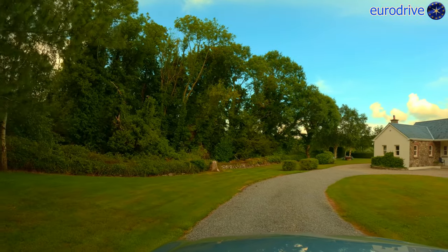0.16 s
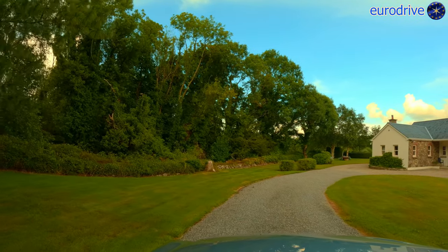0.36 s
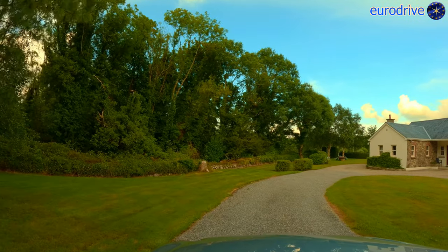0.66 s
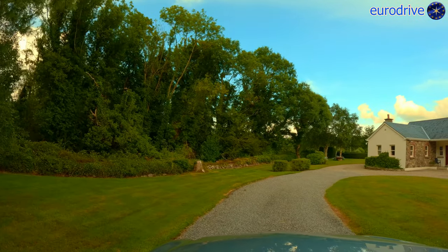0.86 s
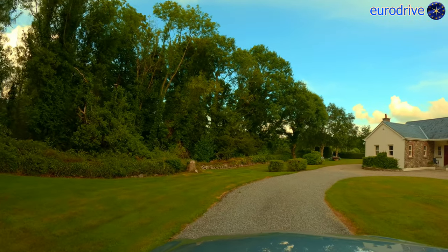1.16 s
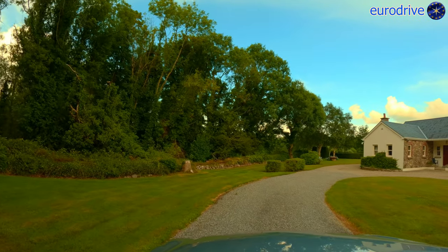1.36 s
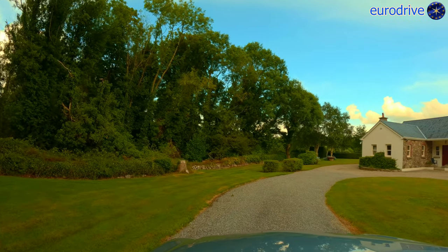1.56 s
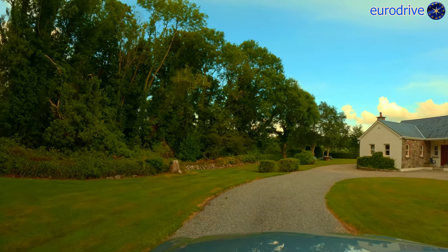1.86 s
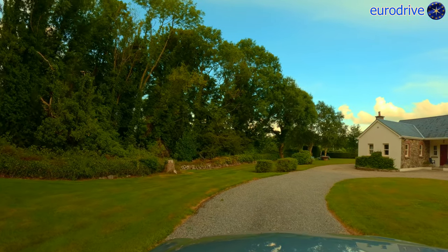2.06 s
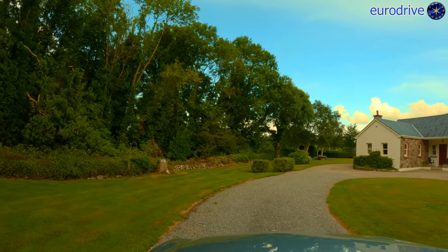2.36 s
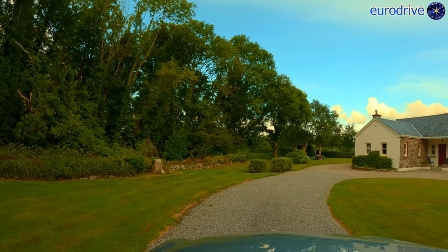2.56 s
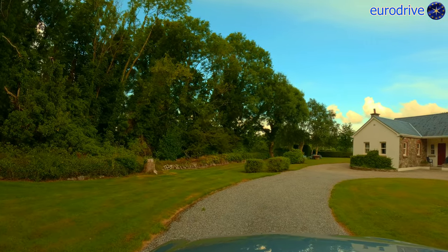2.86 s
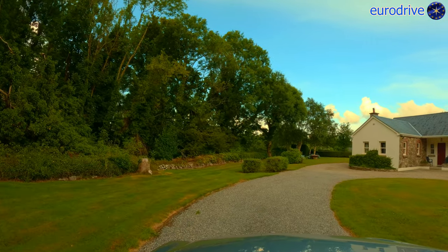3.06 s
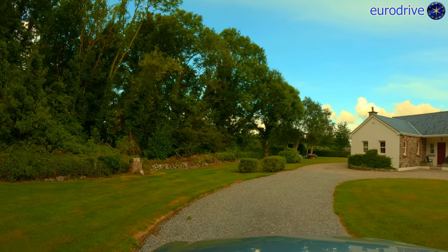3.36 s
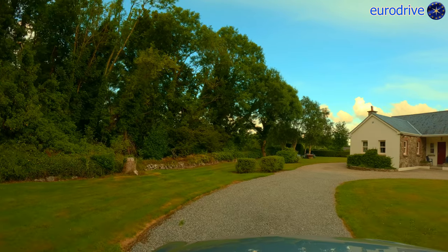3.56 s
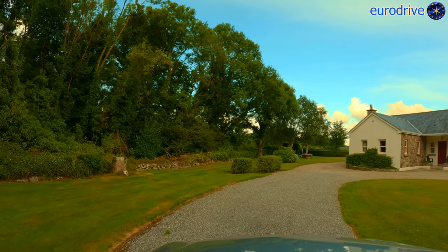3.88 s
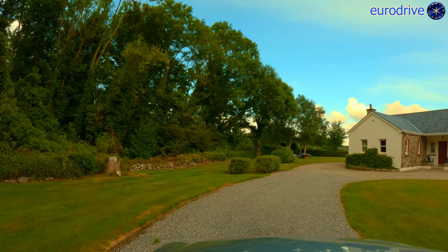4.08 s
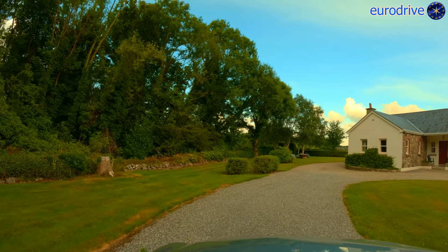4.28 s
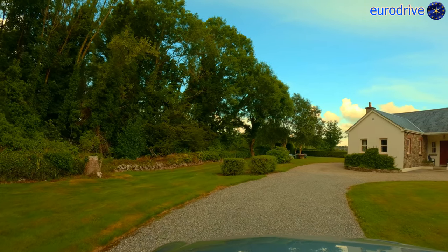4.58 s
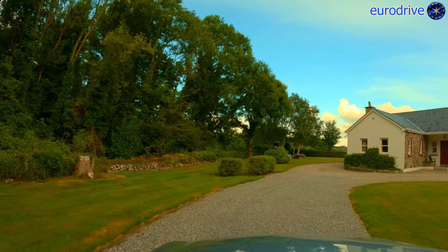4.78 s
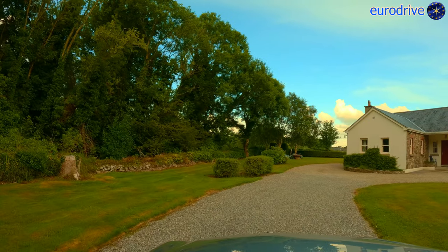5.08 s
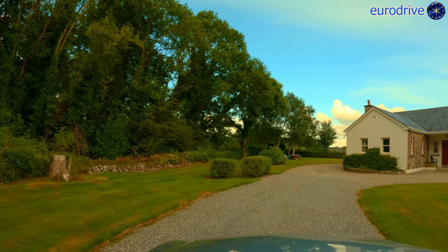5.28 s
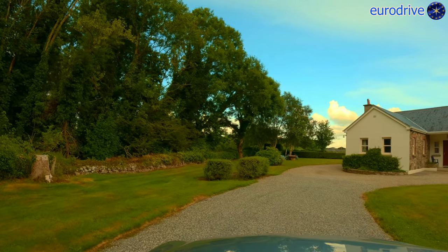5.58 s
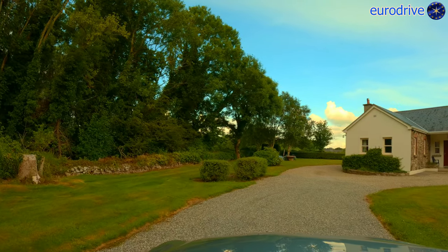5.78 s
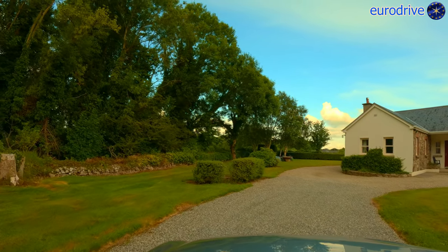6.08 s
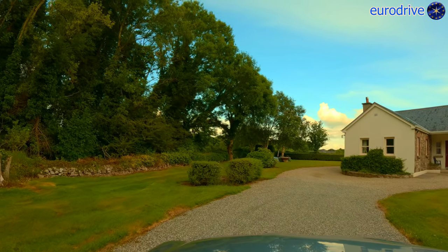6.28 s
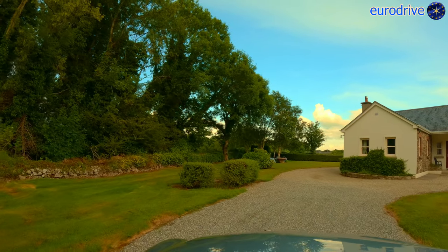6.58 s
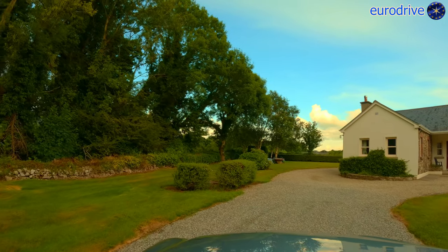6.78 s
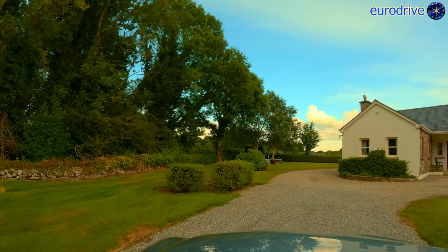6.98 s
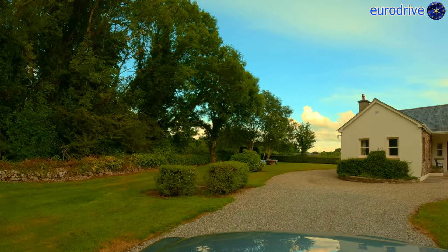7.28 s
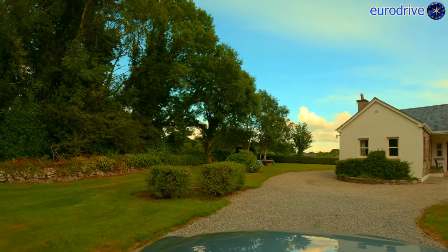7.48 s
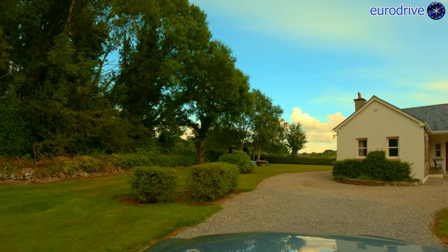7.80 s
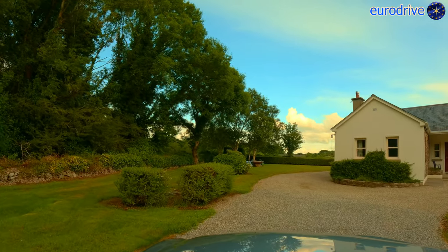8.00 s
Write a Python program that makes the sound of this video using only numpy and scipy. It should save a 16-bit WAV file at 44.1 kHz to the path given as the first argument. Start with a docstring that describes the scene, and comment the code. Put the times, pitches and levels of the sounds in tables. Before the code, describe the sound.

Heard from inside a closed car rolling slowly along a gravel driveway. A deep, noisy engine and body drone runs throughout, swelling with each small bump. Over it, stones grind continuously under the tyres, muffled and mid-pitched, with random pops, small cracks and short sliding clumps. A fine grit hiss lies on top, a little stronger on the left. The car keeps creeping to the end.

```python
"""Closed cabin of a car that creeps along a loose gravel drive.
Stones grind and pop under the tyres, muffled by the body: random contacts excite struck spectra.
Fine grit hisses, more on the left; stones crack against each other; clumps give way in short swells.
Engine and uneven ground drive a low noise drone, and a deep boom sways in opposite phase left and right."""
import sys
import numpy as np
from scipy import signal
from scipy.fft import rfft, irfft, next_fast_len
from scipy.io import wavfile
from scipy.ndimage import uniform_filter1d, map_coordinates

SR = 44100
rng = np.random.default_rng(int(sys.argv[2]) if len(sys.argv) > 2 else 0)


def log_audio(samples):
    """Write samples as a 16-bit WAV file to the path given in sys.argv[1]."""
    # one column per channel
    frames = np.atleast_2d(samples).T
    # limit to full scale, then quantise
    limited = np.clip(frames, -1, 1)
    pcm = np.round(limited * 32767).astype(np.int16)
    wavfile.write(sys.argv[1], SR, pcm)


N = 358974

# bumps under the wheels: (time [s], rise of deep drone [dB], rise of tyre rumble [dB])
BUMP_RISES = [(0.3, 4, 1.5), (0.51, 3.5, 2), (0.7, -1, 2), (1.0, 5.5, -0.5), (1.16, 1.5, 5.5), (1.76, 2, 1),
              (2.84, -0.5, 3.5), (3.36, -1, 1.5), (3.68, -1, 4), (3.88, -2, 1.5), (4.05, -2.5, 5.5),
              (4.26, 2, 3.5), (4.46, 3, 1), (5.45, 4, 2), (5.62, 5.5, 4.5), (5.87, 3.5, 2),
              (6.12, 1.5, 2.5), (6.52, 2.5, 1.5), (6.84, 3, 1), (7.07, 3.5, 1.5), (7.65, 4, -0.5),
              (7.93, 6.5, 2.5)]
BUMP_S = 0.084  # rise time, and fall time
# spectrum of a stone's knock, relative: (frequency [Hz], level [dB])
KNOCK_SPECTRUM = [(150, -31), (330, -5), (450, -4.5), (580, -5), (730, 0.5), (830, -0.5), (980, 2.5),
                  (1150, -0.5), (1420, 0), (1700, -9.5), (2200, -22.5), (3200, -28), (6000, -40),
                  (9000, -57)]


def amp(db):
    """Decibels to gain."""
    return 10 ** (np.asarray(db) / 20)


def unit(x):
    """Scale to rms 1."""
    return x / np.sqrt(np.mean(x ** 2) + 1e-20)


def along(points, hz):
    """Read (Hz, value) points on a log frequency axis."""
    point_hz, value = np.transpose(points)
    return np.interp(np.log(hz + 1), np.log(point_hz + 1), value)


def curve(rows):
    """Join (s, value) rows into one value per sample."""
    return np.interp(np.arange(N) / SR, *np.transpose(rows))


def swells(rows, half_s):
    """Raised-cosine swell around each row's time: one dB curve per column after the time."""
    time_s, *heights_db = np.transpose(rows)
    away = np.abs(np.arange(N) / SR - time_s[:, None]) / half_s
    shape = (np.cos(np.pi * np.minimum(away, 1)) + 1) / 2
    return np.array(heights_db) @ shape


def wobble(rate_hz):
    """Smooth random curve, rate_hz knots a second."""
    knots = rng.standard_normal(int(N * rate_hz / SR) + 4)
    return map_coordinates(knots, [np.arange(N) * rate_hz / SR])


def filtered(x, response):
    """Multiply the spectrum of x by a response of frequency, zero-padded."""
    n = x.shape[-1]
    padded = next_fast_len(n + SR // 2)
    spectrum = rfft(x, padded) * response(np.fft.rfftfreq(padded, 1 / SR))
    return irfft(spectrum, padded)[..., :n]


def noise(colour):
    """Coloured Gaussian noise of rms 1."""
    return unit(filtered(rng.standard_normal(N), lambda hz: amp(along(colour, hz))))


def struck(colour, size=2048):
    """Minimum-phase click with this spectrum, peak 1."""
    log_gain = np.log(amp(along(colour, np.fft.rfftfreq(size, 1 / SR))))
    cepstrum = irfft(log_gain)
    # fold the cepstrum to its causal half
    cepstrum[1:size // 2] *= 2
    cepstrum[size // 2 + 1:] = 0
    click = irfft(np.exp(rfft(cepstrum)))
    return click / np.abs(click).max()


def steady(x, seconds):
    """Hold the rms near 1 over spans of this length, keeping the finer texture."""
    power = np.mean(np.atleast_2d(x) ** 2, axis=0)
    width = max(int(seconds * SR), 2)
    smooth_power = uniform_filter1d(uniform_filter1d(power, width), width)
    return unit(x / np.sqrt(np.abs(smooth_power) + 1e-12))


def burst(x, length_s):
    """Scale a short sound's left-right mean to the energy of rms 1 held for length_s."""
    return x / np.sqrt(np.sum(x.mean(0) ** 2) / (length_s * SR) + 1e-20)


def panned(balance_db):
    """Left and right gains for a left-minus-right level difference."""
    return amp(np.array([[balance_db], [-balance_db]]) / 2)


def left_first(x, lag_ms):
    """Sound from the left wheels reaches the right side a moment later."""
    sides = np.array([[1], [-1]])
    return filtered(x, lambda hz: np.exp(1j * np.pi * sides * hz * lag_ms / 1000))


def add(track, time_s, sound):
    """Mix a stereo sound into the track at a time."""
    part = track[:, max(round(time_s * SR), 0):][:, :sound.shape[1]]
    part += sound[:, :part.shape[1]]


def cabin(x, wet_db, size=4096):
    """Direct sound plus a fresh diffuse tail from glass and trim on each side."""
    # decay of the cabin's short answer: (frequency [Hz], t60 [s])
    decay_times = [(300, 0.062), (1200, 0.051), (6000, 0.062)]
    hz, t, z = signal.stft(rng.standard_normal((2, size)), SR, nperseg=128)
    decay = amp(-60 * t / along(decay_times, hz)[:, None])
    tail = signal.istft(z * decay, SR, nperseg=128)[1]
    tail *= amp(wet_db) / np.linalg.norm(tail[0])
    tail[:, 0] += 1  # direct sound
    return signal.fftconvolve(x, tail, axes=1)


def contacts(rate_hz, scatter_db, size):
    """Random stone contacts as signed impulses, rate_hz a second: many small, few large."""
    happens = rng.random(size) < rate_hz / SR
    strength = amp(scatter_db * np.minimum(rng.standard_normal(size), 2.5))
    return happens * strength * rng.choice([-1, 1], size)


def churn():
    """Effort of the tyres in dB above its average."""
    # how hard the tyres churn the gravel: (time [s], level [dB])
    effort = [(0.0, -54), (0.54, -51.5), (1.45, -54), (1.75, -52.5), (2.31, -56.5), (2.92, -55.5),
              (3.4, -52), (3.76, -54), (4.17, -53), (4.44, -55), (5.46, -54), (5.53, -54.5), (6.21, -52),
              (6.32, -53), (8.0, -53), (8.14, -53)]
    db = curve(effort)
    return db - db.mean()


def boom():
    """Lowest body resonance swings in opposite phase, harder as the car rocks; bumps stir the panels."""
    # the body rocks on its springs: (time [s], rise of the boom [dB])
    rocks = [(0.16, 10), (1.46, 5.5), (2.69, 5), (3.36, 3), (4.06, 6), (4.45, 10), (5.07, 8), (5.3, 5),
             (5.78, 7), (6.19, 8), (6.7, 6.5), (7.57, 8)]
    # relative spectra of boom and panel hum: (frequency [Hz], level [dB])
    boom_spectrum = [(12, -29), (22, -36), (29, -8), (36, 0.5), (41, -4), (47, -17), (56, -20), (75, -63),
                     (150, -100)]
    panel_spectrum = [(40, -51), (58, -6), (70, 3), (79, 4), (95, 3), (113, 10), (135, -12), (300, -50)]
    even_ground_db, panel_db = -30.5, -52.5
    panel_db_per_thud_db = 0.8
    rock_db, = swells(rocks, half_s=0.14)
    thud_db = swells(BUMP_RISES, BUMP_S)[1]
    low_db = even_ground_db + rock_db + 1.2 * wobble(9)
    low = amp(low_db) * steady(noise(boom_spectrum), seconds=0.055)
    panels = amp(panel_db + panel_db_per_thud_db * thud_db) * steady(noise(panel_spectrum), seconds=0.15)
    return np.array([low + panels, -low - panels])


def drone():
    """Engine and wheels shake the cabin: deep drone and hollow tyre rumble, both moved by bumps."""
    # brief lulls of the deep drone: (time [s], dip [dB])
    lulls = [(2.93, -6), (3.46, -8), (7.2, -13), (7.51, -7.5)]
    # relative spectra of deep drone and tyre rumble: (frequency [Hz], level [dB])
    deep_spectrum = [(8, -15), (20, -5.5), (31, 4), (38, -4), (52, -7), (62, -8), (72, -16), (81, -10.5),
                     (95, -13), (110, -28), (150, -35.5), (300, -90)]
    rumble_spectrum = [(70, -29), (120, 7), (137, -4.5), (152, 1.5), (180, -5), (270, -5), (330, -11.5),
                       (450, -15.5), (800, -24.5), (2000, -94)]
    deep_even_db = -35
    rumble_even_db, rumble_db_per_churn_db = -50.5, 0.37
    heave_db, thud_db = swells(BUMP_RISES, BUMP_S)
    lull_db, = swells(lulls, half_s=0.064)
    deep = amp(deep_even_db + heave_db + lull_db) * steady(noise(deep_spectrum), seconds=0.18)
    shared, apart = noise(rumble_spectrum), amp(-9) * noise(rumble_spectrum)
    rumble_db = rumble_even_db + rumble_db_per_churn_db * churn() + thud_db + 0.76 * wobble(12)
    rumble = amp(rumble_db) * steady(np.array([shared + apart, shared - apart]), seconds=0.2)
    return deep * panned(0.77) + left_first(rumble, lag_ms=0.3) * panned(1.1)


def grinding(colour, rate_hz):
    """Stones of one size grind in little fits that start at once and die away; rms 1."""
    fit_s = 0.0078  # time constant of a fit
    starts = np.abs(contacts(rate_hz=70, scatter_db=2.5, size=N))
    fits = signal.lfilter([1], [1, -np.exp(-1 / (fit_s * SR))], starts)
    grains = contacts(rate_hz, scatter_db=5.5, size=N) * np.sqrt(1 + 0.9 * fits ** 2)
    # random balance of every grain
    grains = grains * amp(np.array([[1], [-1]]) * 2.4 * rng.standard_normal(N))
    # each patch of ground reaches the cabin a little differently
    heard = np.zeros((2, N))
    for patch in np.array_split(np.arange(N), 90):
        add(heard, patch[0] / SR, cabin(grains[:, patch], wet_db=-6.5))
    coloured = signal.oaconvolve(heard, struck(colour)[None], axes=1)[:, :N]
    return steady(coloured, seconds=0.14)


def crunch():
    """Large stones knock, small ones clatter; both grow with the churn and flutter as the ground gives."""
    # relative spectra of large and small stones: (frequency [Hz], level [dB])
    large_spectrum = [(150, -24.5), (330, -9), (450, -7.5), (580, -5.5), (730, -1.5), (830, -3.5),
                      (980, 0.5), (1120, -5.5), (1400, -14), (2000, -27.5), (6000, -50.5)]
    small_spectrum = [(400, -23), (900, -11.5), (1200, 0.5), (1420, 1), (1700, -7), (2200, -15),
                      (3200, -20), (6000, -32), (9000, -63)]
    # level at average churn, and dB gained per dB of churn
    large_mean_db, large_growth = -54.5, 1.28
    small_mean_db, small_growth = -57, 0.66
    effort_db = churn() + 0.45 * wobble(12)
    large_db = large_mean_db + large_growth * effort_db
    small_db = small_mean_db + small_growth * effort_db + 0.75 * wobble(10)
    large = amp(large_db) * grinding(large_spectrum, rate_hz=3000) * panned(-2.1)
    small = amp(small_db) * grinding(small_spectrum, rate_hz=3000) * panned(-1.0)
    return large + small


def grit():
    """Countless tiny contacts merge into a hiss: bright from the left, duller where the cabin scatters it."""
    # hiss at average churn: (time [s], level [dB])
    hiss = [(0.0, -66), (1.47, -68), (1.59, -66.5), (2.54, -69), (3.06, -68), (3.35, -66), (4.28, -66),
            (5.78, -68), (6.01, -67), (6.85, -66.5), (7.03, -68), (8.14, -66)]
    # relative spectra of direct and scattered hiss: (frequency [Hz], level [dB])
    fine_spectrum = [(1200, -25), (2300, -7.5), (3200, 0.5), (4000, 2.5), (5200, 3), (6200, -0.5),
                     (7200, -5.5), (8200, -14), (10000, -25), (16000, -52)]
    scatter_spectrum = [(900, 1), (2100, 2), (2800, -1), (4000, -16), (5500, -12.5), (7000, -16),
                        (8200, -32), (12000, -45)]
    fine_db, scattered_db = -1, 2.5  # relative to the hiss level
    hiss_db_per_churn_db = 0.25
    touches = contacts(rate_hz=12000, scatter_db=5.0, size=N)
    fine = unit(signal.fftconvolve(touches, struck(fine_spectrum))[:N])
    scattered = np.array([noise(scatter_spectrum), noise(scatter_spectrum)]) * panned(0.68)
    level_db = curve(hiss) + hiss_db_per_churn_db * churn() + 0.61 * wobble(14)
    return amp(level_db) * (amp(fine_db) * fine * panned(7.0) + amp(scattered_db) * scattered)


def cracks(size=3072):
    """Hard stones snap and chatter against each other, brightest at the pitch of their size."""
    # cracks of stone on stone: (time [s], level before the muffling [dB], ring [Hz])
    snaps = [(.280, -65, 4800), (.487, -59, 2700), (.599, -56, 1980), (0.634, -58, 2050), (.846, -58, 5800),
             (1.545, -67, 4800), (1.672, -61, 2400), (2.031, -63, 2100), (2.194, -59, 2100),
             (2.872, -67, 4700), (3.065, -60, 2090), (3.226, -52, 2750), (3.408, -60, 1800),
             (3.906, -57, 1590), (4.324, -55, 1550), (4.378, -63, 1980), (4.469, -63.5, 3920),
             (4.886, -58, 1700), (5.152, -59.5, 1840), (5.871, -58, 2150), (6.766, -60, 2480)]
    # what the body lets through of a crack: (frequency [Hz], gain [dB])
    muffle = [(3000, 2), (5700, 6), (7000, -9), (9000, -38), (16000, -50)]
    # a stone's spectrum: (multiple of its pitch, level [dB])
    shape = [(.2, -12), (.5, -3), (.8, -4), (1, 0), (1.15, -8), (2, -16), (4, -32)]
    track, t = np.zeros((2, N)), np.arange(size) / SR
    for time_s, db, ring_hz in snaps:
        chatter = contacts(rate_hz=2200, scatter_db=3, size=size) * amp(-60 * t / 0.087)
        chatter[0] = 2  # the snap itself
        ring = struck([(ring_hz * multiple, level_db) for multiple, level_db in shape])
        crack = cabin(signal.fftconvolve(chatter, ring)[None], wet_db=-4)
        add(track, time_s, amp(db) * burst(crack, length_s=0.015) * panned(2))
    return filtered(track, lambda hz: amp(along(muffle, hz)))


def slides(size=4096):
    """A clump of gravel collapses in a quick swell of dense knocks."""
    # clumps that give way: (time [s], level before the low-pass [dB], length [s])
    clumps = [(.285, -49, 0.049), (.625, -51, 0.056), (3.662, -49, 0.052), (4.865, -52, 0.055),
              (5.684, -48.5, 0.069), (6.106, -45.5, 0.061), (6.316, -48, .045), (6.53, -50, 0.067),
              (7.301, -46, 0.063), (7.784, -47.5, 0.053), (8.114, -49.5, 0.051)]
    track, t = np.zeros((2, N)), np.arange(size) / SR
    knock = struck(KNOCK_SPECTRUM)
    for time_s, db, length_s in clumps:
        swell = np.sin(np.pi * np.minimum(t / length_s, 1) ** 0.5)
        knocks = contacts(rate_hz=2500, scatter_db=2, size=size) * swell
        slide = cabin(signal.fftconvolve(knocks, knock)[None], wet_db=-4)
        add(track, time_s, amp(db) * burst(slide, length_s))
    # the tyre lies on the clump and smothers its treble
    return signal.sosfilt(signal.butter(2, 1400, fs=SR, output="sos"), track)


def stones(size=4096):
    """A pinched stone pops out and rattles its neighbours."""
    # stones that pop out under a tyre: (time [s], level [dB], left minus right [dB])
    pops = [(0.487, -38.5, -1), (0.599, -46.5, -5), (0.681, -47, -5), (0.714, -49, -4), (1.044, -50, -5),
            (1.289, -50, 0.5), (1.554, -45, -2.5), (1.667, -43.5, -3), (1.839, -47, -5), (2.029, -49, -4),
            (2.415, -51, 2), (2.871, -46, -2.0), (2.923, -48.5, 3), (3.065, -47.5, -7),
            (3.227, -43.5, -3.0), (3.906, -47.5, -5), (4.133, -49, -2.0), (4.17, -43.5, 1),
            (5.395, -47.5, 1), (5.476, -46, 4), (5.664, -59, 4), (6.011, -47, 3), (6.238, -48, 2),
            (6.532, -46, 0), (6.759, -46.5, 2), (7.121, -47.5, 4), (7.655, -44, 3), (7.79, -52, 0)]
    pop_s = 0.0085  # span that a pop's level refers to
    track, t = np.zeros((2, N)), np.arange(size) / SR
    knock = struck(KNOCK_SPECTRUM)
    for time_s, db, balance_db in pops:
        rattle = 0.54 * contacts(rate_hz=1800, scatter_db=3.5, size=size) * amp(-60 * t / 0.048)
        rattle[0] = 1  # the pop itself
        pop = cabin(signal.fftconvolve(rattle, knock)[None], wet_db=-4)
        add(track, time_s, amp(db) * burst(pop, pop_s) * panned(balance_db))
    return track


def scene():
    """Drone and boom below, gravel knocks in the middle, grit and cracks on top."""
    gravel = left_first(crunch() + stones() + slides(), lag_ms=0.075)
    return boom() + drone() + gravel + grit() + cracks()


def record(dry):
    """The recorder adds its own faint wide hiss and keeps nothing above its band limit."""
    top_hz = 15750
    mid = amp(-77.0) * rng.standard_normal(N)
    side = amp(-75.0) * rng.standard_normal(N)
    return filtered(dry + np.array([mid + side, mid - side]), lambda hz: hz < top_hz)


dry = scene()
out = record(dry)
log_audio(out)
```